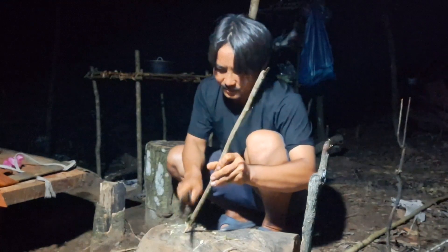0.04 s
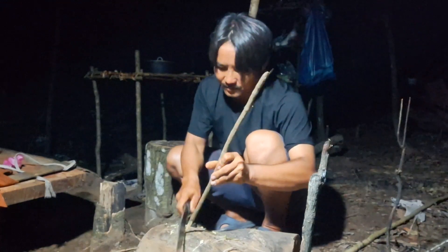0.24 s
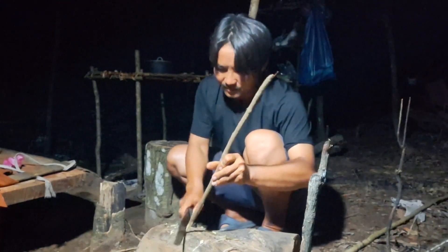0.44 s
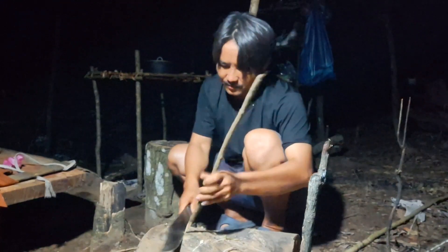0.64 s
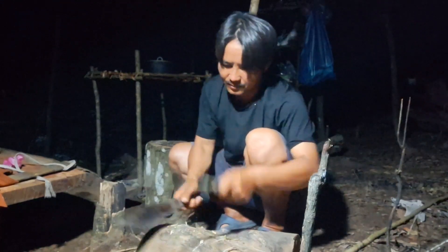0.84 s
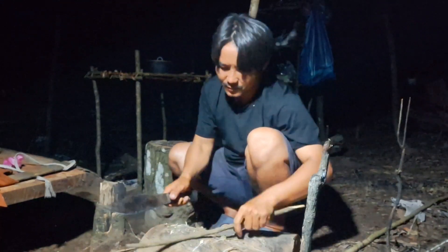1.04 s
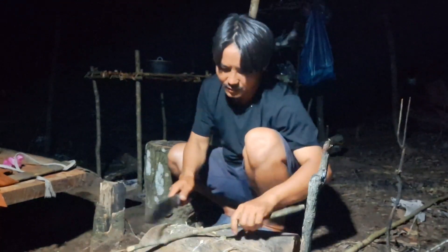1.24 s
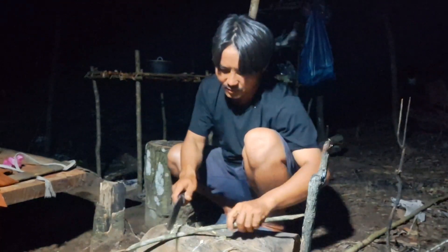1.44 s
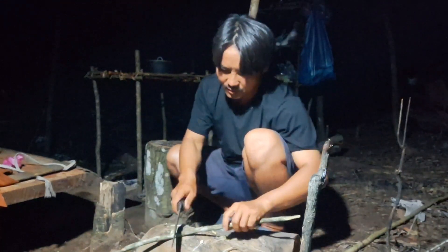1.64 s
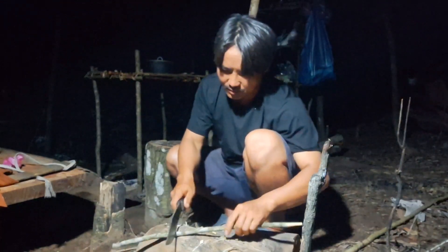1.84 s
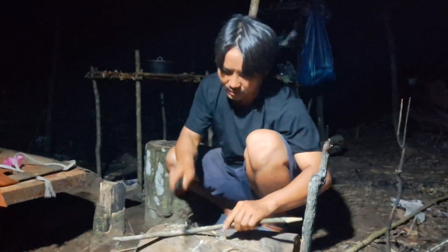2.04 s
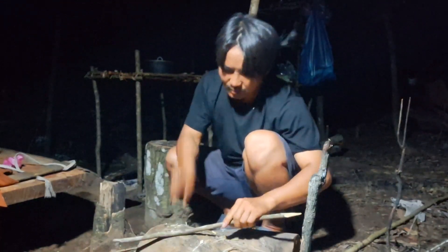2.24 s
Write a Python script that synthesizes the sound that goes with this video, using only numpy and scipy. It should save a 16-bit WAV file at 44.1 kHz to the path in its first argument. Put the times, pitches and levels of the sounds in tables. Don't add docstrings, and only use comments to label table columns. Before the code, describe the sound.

Two quick sharp wood chops come early, the second slightly softer and drier, followed by a small brush of the stick; dense high cricket chirping and raspy katydids continue throughout, close stereo microphones in open night air.

```python
import sys
import numpy as np
from scipy import signal
from scipy.io import wavfile

SR = 44100
rng = np.random.default_rng(int(sys.argv[2]) if len(sys.argv) > 2 else 0)


def transcribe(signal):
    frames = np.atleast_2d(signal).T
    limited = np.clip(frames, -1, 1)
    pcm = np.round(limited * 32767).astype(np.int16)
    wavfile.write(sys.argv[1], SR, pcm)


def voltage_ratio(decibels):
    exponent = np.asarray(decibels, float) / 20
    return 10 ** exponent


N = 101429
T = np.arange(N) / SR
MIC_PAN_DB = 2.5


def rms_one(x):
    return x / np.sqrt(np.mean(x ** 2) + 1e-20)


def in_time(rows):
    return np.interp(T, *np.transpose(rows))


def at_hz(points, hz):
    table = np.array(points)
    return np.interp(np.log(hz), np.log(table[:, 0]), table[:, 1])


def drift(rate_hz):
    r = np.exp(-80 * np.pi * rate_hz / SR)
    white = rng.standard_normal(N // 40 + 2002)
    slow = signal.lfilter([1], [1, -2 * r, r * r], white)[2000:]
    return np.interp(np.arange(N) / 40, np.arange(len(slow)), rms_one(slow))


def ring(x, hz, t60_s):
    r = voltage_ratio(-60 / (t60_s * SR))
    w = 2 * np.pi * hz / SR
    return signal.lfilter([0, np.sin(w)], [1, -2 * r * np.cos(w), r * r], x + 1e-18)


def high_pass(x, hz, order):
    return signal.sosfilt(signal.butter(order, hz, "high", fs=SR, output="sos"), x)


def band_pass(x, low_hz, high_hz, order=2):
    return signal.sosfilt(signal.butter(order, [low_hz, high_hz], "band", fs=SR, output="sos"), x)


def band(x, hz, width_hz, order=2):
    return rms_one(band_pass(x, hz - width_hz / 2, hz + width_hz / 2, order))


def gate(start_s, length_s, edge_s):
    return np.clip(np.minimum(T - start_s, start_s + length_s - T) / edge_s + .5, 0, 1)


def dying(start_s, t60_s):
    return (T >= start_s) * voltage_ratio(-60 * np.maximum(T - start_s, 0) / t60_s)


def pan(x, db):
    return x * voltage_ratio(np.array([[db / 2], [-db / 2]]))


def coloured(spectrum, patchy_db):
    # hz, correlation
    likeness = [(60, 1), (180, 0.87), (550, 0.39), (1650, 0.022), (4970, -0.49), (15000, 0.24)]
    out, white = 0, rng.standard_normal((2, 2, N))
    edges_hz = np.geomspace(spectrum[0][0], spectrum[-1][0], 15)
    for k, (low_hz, high_hz) in enumerate(zip(edges_hz, edges_hz[1:])):
        mid, side = band_pass(white[k % 2], low_hz, high_hz)
        centre_hz = np.sqrt(low_hz * high_hz)
        alike = np.clip(at_hz(likeness, centre_hz), -1, 1)
        stereo = np.sqrt(1 + alike) * mid + np.sqrt(1 - alike) * side * [[1], [-1]]
        out = out + voltage_ratio(at_hz(spectrum, centre_hz) + patchy_db * drift(10.5)) * stereo
    return rms_one(out)


def foliage(x):
    t60_s, level_db = 0.087, 7
    n = SR // 5
    echo = rng.standard_normal((2, n)) * voltage_ratio(-60 * T[:n] / t60_s)
    echo = echo / np.sqrt(np.sum(echo ** 2, axis=1, keepdims=True))
    return x + voltage_ratio(level_db) * signal.fftconvolve(x, echo, axes=1)[:, :N]


def night_air():
    # hz, density_db_per_hz
    rumble = [(22, -32), (38, -1.5), (76, -2), (245, -20), (373, -23), (465, -30.5), (519, -29),
              (1250, -39.5), (3000, -39), (3900, -113), (6600, -120)]
    # hz, density_db_per_hz
    thin_hiss = [(2500, -59), (3400, 2.5), (6300, -9), (7000, 21.5), (9000, 3), (11200, -6), (14000, -1.5),
                 (16000, -1)]
    return voltage_ratio(-35.5) * coloured(rumble, patchy_db=2.5) + voltage_ratio(-48) * coloured(thin_hiss, patchy_db=-4.1)


def fibre_hiss():
    # hz, density_db_per_hz
    fibre_spectrum = [(1470, -22), (2500, -19), (4260, -15), (4790, 11), (6330, -32.5), (8170, -7),
                      (11800, -16.5), (15900, -13.5)]
    return coloured(fibre_spectrum, patchy_db=1)


def brushes(hiss):
    # start_s, length_s, hiss_db, knock_db
    small_sounds = [
        (.0, 0.017, -55, -62),
        (0.777, 0.0046, -38, -75),
        (1.708, .011, -34.5, -41.5),
    ]
    dull = band(rng.standard_normal(N), 530, 270)
    out = 0
    for start_s, length_s, hiss_db, knock_db in small_sounds:
        hiss_burst = voltage_ratio(hiss_db) * hiss * gate(start_s, length_s, 0.0048)
        out = out + hiss_burst + voltage_ratio(knock_db) * dull * dying(start_s, 0.14)
    return out


def field_crickets():
    # first_pulse_s, pulses_per_s, top_hz, level_db, pan_db
    singers = [
        (.002, 23.0, 5150, 3, -5),
        (.015, 29, 4950, 5.5, 17),
        (0.034, 21.5, 4800, 3, -21),
        (0.0088, 26.0, 5250, -19.5, 14),
        (0.02, 19.5, 4600, -8.5, -4.5),
    ]
    # time_s, level_db
    effort = [(0, -35), (.08, -38.5), (.3, -34.5), (.4, -38.5), (.5, -33), (.58, -37), (.62, -45),
              (.68, -43.5), (.76, -33.5), (.9, -32), (1.04, -30), (1.12, -32.5), (1.4, -32), (1.5, -36),
              (1.62, -29.5), (2.0, -35.5), (2.1, -29.5), (2.3, -34)]
    sweep_share, pulse_share = .2, .85
    second_db, third_db = -29, -21.5
    far = [(a / 20, 18.0 + 9.0 * b, np.interp(c, [0, 1], (4185, 5232)), -4.5, 3.5 + 12.0 * (d - .5))
           for a, b, c, d in rng.random((22, 4))]
    out = 0
    for first_s, pulses_per_s, top_hz, db, pan_db in [*singers, *far]:
        cycle = ((T - first_s) * pulses_per_s + .15 * drift(1.4)) % 1
        stroke = np.minimum(cycle / pulse_share, 1)
        phase = 2 * np.pi * np.cumsum(top_hz * (1 - sweep_share * stroke ** 1.4)) / SR
        overtones = voltage_ratio(second_db) * np.sin(2 * phase) + voltage_ratio(third_db) * np.sin(3 * phase)
        tone = np.sin(phase) + overtones * (1 - stroke) ** 1.5 * voltage_ratio(4.0 * drift(3))
        envelope = np.sin(np.pi * stroke ** .6) ** 1.2
        out = out + pan(tone * envelope * voltage_ratio(db + 2.5 * drift(4)), pan_db)
    blur = pan(band(rng.standard_normal((2, N)), 4450, 1300, order=4), MIC_PAN_DB)
    return voltage_ratio(in_time(effort)) * rms_one(rms_one(foliage(out)) + voltage_ratio(-8) * blur)


def katydid_rasp():
    # time_s, level_db
    rasp_level = [(0, -52), (.1, -51), (.28, -61), (.45, -51), (.6, -48.5), (.7, -60), (.84, -46.5),
                  (.92, -50), (1.04, -44.5), (1.1, -50), (1.24, -45.5), (1.3, -50.5), (1.4, -44.5),
                  (1.5, -51), (1.62, -44.5), (1.72, -46), (2.02, -48.5), (2.3, -46.5)]
    clicks_per_s = 900
    clicks = (rng.random((2, N)) < clicks_per_s / SR) * rng.standard_normal((2, N))
    return pan(band(foliage(clicks), 7816, 550) * voltage_ratio(in_time(rasp_level)), 3.9)


def trill():
    # start_s, length_s, level_db
    bursts = [(0.168, 0.065, -50.5), (0.412, 0.1, -49.5), (0.632, 0.094, -50), (0.845, 0.091, -49.5),
              (1.003, 0.033, -52), (1.07, 0.097, -49.5), (1.28, 0.12, -48.5), (1.65, 0.088, -48),
              (1.858, 0.1, -49), (2.049, 0.099, -49)]
    pitch_hz, sag_hz, pulses_per_s = 5870, 59.55, 32.5
    turn = T * pulses_per_s % 1
    tone = np.sin(2 * np.pi * np.cumsum(pitch_hz - sag_hz * turn) / SR) * np.sin(np.pi * turn) ** 2.4
    near = 2.1 * tone * sum(voltage_ratio(db) * gate(start_s, length_s, 0.0079) for start_s, length_s, db in bursts)
    far = band(rng.standard_normal((2, N)), 5824, 203, order=3) * voltage_ratio(-46 + 1.6 * drift(20))
    return foliage(pan(near, 13)) + far


def chops(hiss):
    # strike_s, level_db, cutting_s, cutting_db, landing_db (cut stick on block)
    blows = [
        (0.216, -5.5, 0.0043, -18, -15),
        (0.5452, -8.5, 0.0088, -22, 1.5),
    ]
    # hz, level_db, t60_s
    wood = [
        [(604, -7, 0.055), (651, -0.5, 0.047), (903, -4.5, 0.043), (1210, -10, 0.1), (1020, -16.5, 0.069),
         (1675, -15, 0.074), (2005, -9.5, 0.061), (2205, -10, .05), (2730, -14.5, 0.039), (3564, -10, 0.055),
         (4700, -26, .02)],
        [(595, -6.5, 0.036), (637, -2.5, 0.037), (890, -15, 0.039), (1035, -19.5, 0.066), (1236, -5, 0.12),
         (1460, -15, 0.085), (1710, -36, 0.039), (2010, -32, 0.075), (2353, -25, 0.096), (3460, -22, .025),
         (8800, -21, .02)],
    ]
    # hz, level_db, t60_s, delay_s
    thud = [(64.5, -13.5, 0.12, 0.0047), (125.7, -17.5, 0.131, .025), (252, -22.5, 0.089, 0.00091)]
    # hz, density_db_per_hz
    crack_spectrum = [(880, -9.5), (1500, -1.5), (5060, -12), (7210, -21.5), (8280, -15), (12200, -30.5),
                      (14500, -25), (15900, -36)]
    # hz, level_db, t60_s
    tail = [(287, -43, 0.19), (630, -30.5, 0.29), (1150, -29.5, 0.14), (2300, -34, .2), (4900, -33, 0.11),
            (10900, -42.5, 0.19)]
    contact_hz, landing_delay_s = 3400, 0.00065
    longest_ring_s, most_cycles = .06, 110
    mic_spread_turns = 0.085
    soft = np.exp(-2 * np.pi * contact_hz / SR)
    crack = coloured(crack_spectrum, patchy_db=0)
    out = np.zeros((2, N))
    for (strike_s, db, cut_s, cut_db, landing_db), modes in zip(blows, wood):
        click = -1. * (np.arange(N) == int(strike_s * SR))
        blow = click - voltage_ratio(landing_db) * np.roll(click, int(landing_delay_s * SR))
        blow = signal.lfilter([(1 - soft) ** 2], [1, -2 * soft, soft * soft], blow)
        blow = high_pass(blow, 400, 2)
        for hz, mode_db, t60_s in modes:
            tone = voltage_ratio(db + mode_db) * ring(blow, hz, min(t60_s, longest_ring_s, most_cycles / hz))
            side, late = rng.normal(size=2)
            lag_s = mic_spread_turns * (1.3 + .6 * late) / hz
            out += pan(np.array([np.interp(T - lag_s, T, tone), tone]), 1.0 * side + 1.0 * (hz < 700))
        for hz, thud_db, t60_s, delay_s in thud:
            out += voltage_ratio(thud_db) * ring(np.roll(click, int(delay_s * SR)), hz, t60_s)
        out += hiss * voltage_ratio(cut_db) * gate(strike_s - cut_s, cut_s, 0.00056)
        out += crack * voltage_ratio(-10) * dying(strike_s, 0.033)
    for hz, tail_db, t60_s in tail:
        noise = rng.standard_normal((2, N)) + 0.52 * rng.standard_normal(N)
        decay = sum(dying(strike_s, t60_s) * (1 - dying(strike_s, 0.01)) for strike_s, *_ in blows)
        out += voltage_ratio(tail_db) * band(noise, hz, 0.67 * hz) * decay
    return out


def katydid_buzz():
    # start_s, length_s, level_db
    buzzes = [
        (0.414, 0.113, -55),
        (1.565, .11, -52.5),
    ]
    throb = 0.73 + np.sin(np.pi * 59 * T) ** 2
    buzz = band(rng.standard_normal((2, N)), 9340, 470) * throb
    return pan(buzz * sum(voltage_ratio(db) * gate(start_s, length_s, 0.013) for start_s, length_s, db in buzzes), -8)


def scene():
    hiss = fibre_hiss()
    wood_and_air = pan(night_air() + brushes(hiss) + chops(hiss), MIC_PAN_DB)
    return wood_and_air + field_crickets() + katydid_rasp() + trill() + katydid_buzz()


def roll_off(x):
    return signal.sosfilt(signal.butter(12, 16420, fs=SR, output="sos"), x)


def record(dry):
    wet = np.array([high_pass(x, cut_hz, 3) for x, cut_hz in zip(dry, (37.5, 45.4))])
    overloaded = np.clip(wet, -.97, .97)
    mix = signal.sosfilt(signal.ellip(10, .2, 70, 15900, fs=SR, output="sos"), overloaded)
    return roll_off(mix)


dry = scene()
out = record(dry)
transcribe(out)
```